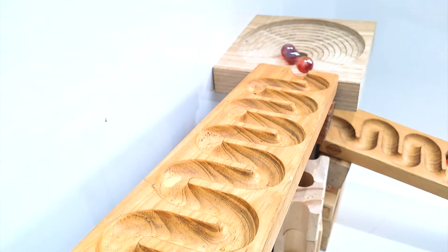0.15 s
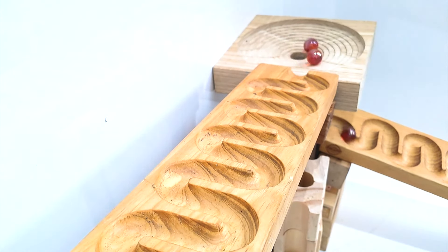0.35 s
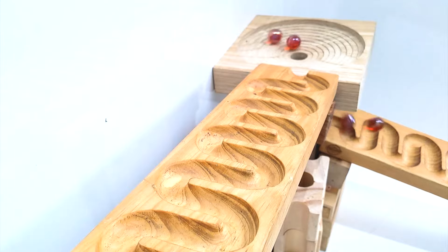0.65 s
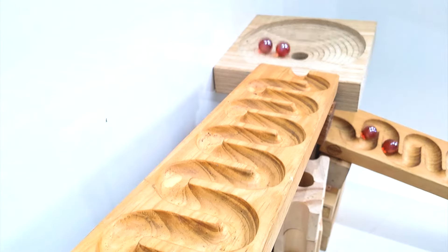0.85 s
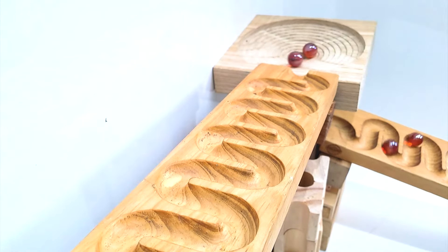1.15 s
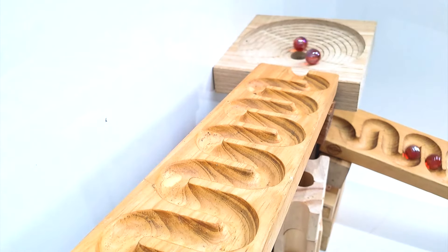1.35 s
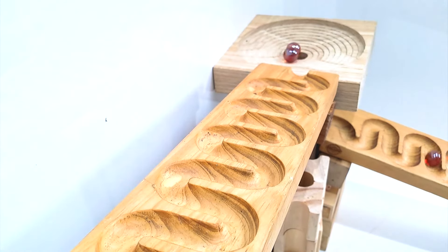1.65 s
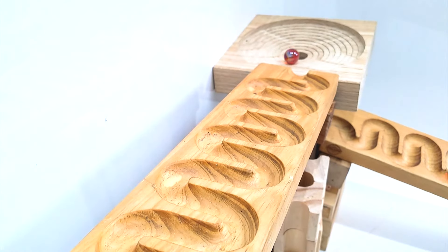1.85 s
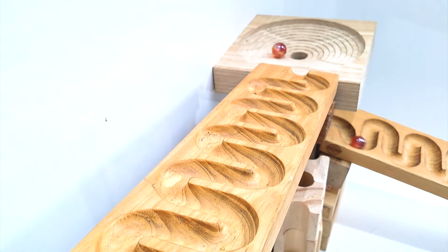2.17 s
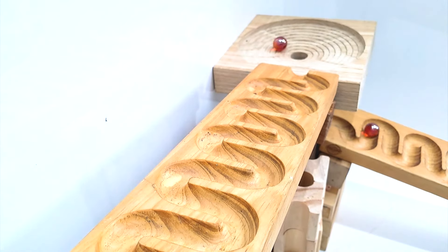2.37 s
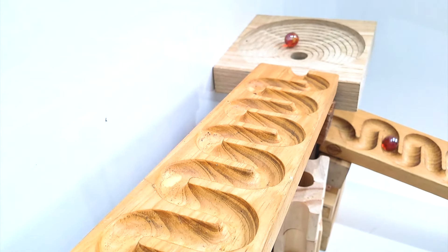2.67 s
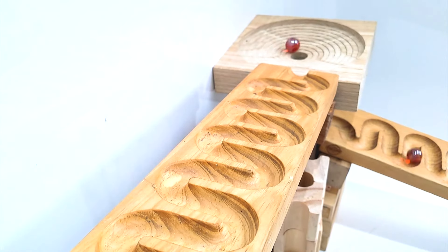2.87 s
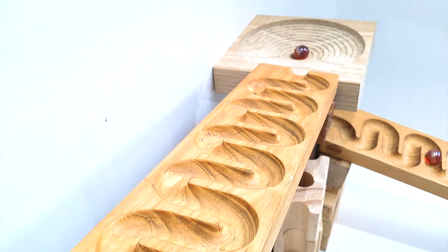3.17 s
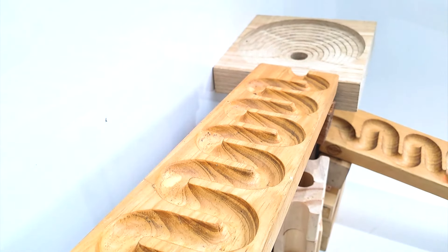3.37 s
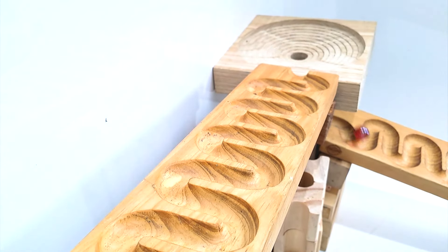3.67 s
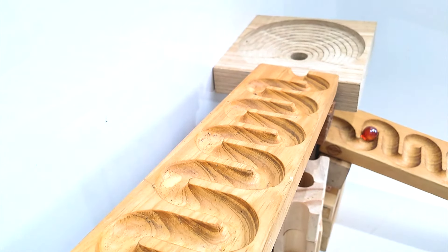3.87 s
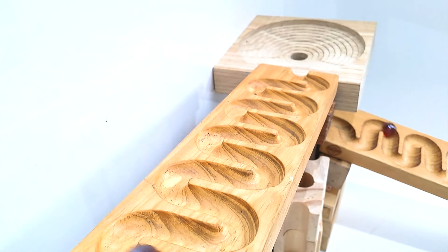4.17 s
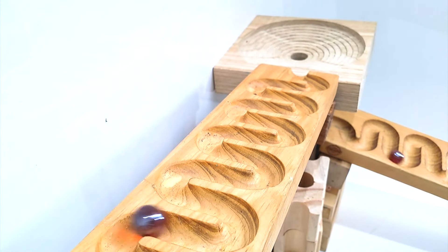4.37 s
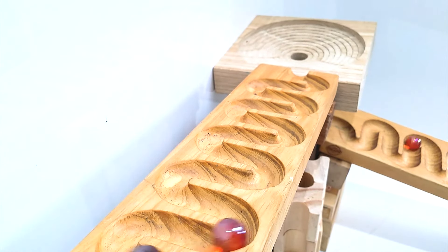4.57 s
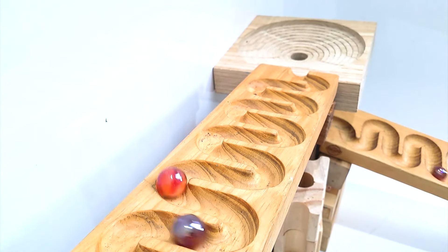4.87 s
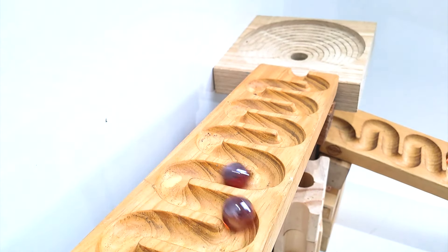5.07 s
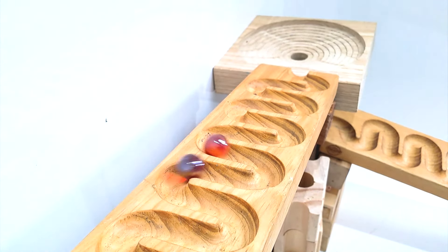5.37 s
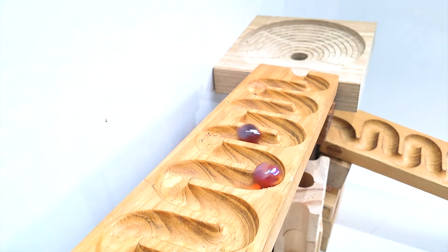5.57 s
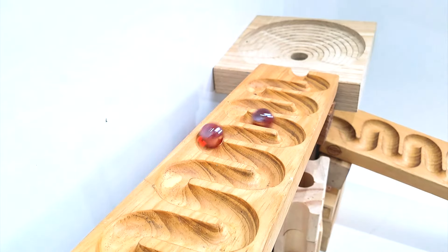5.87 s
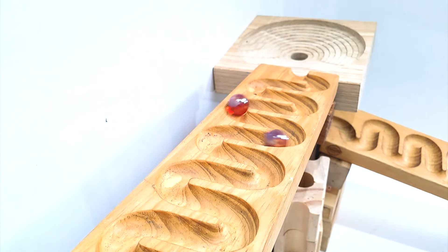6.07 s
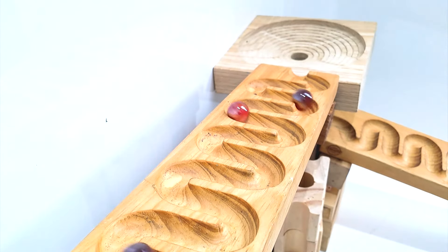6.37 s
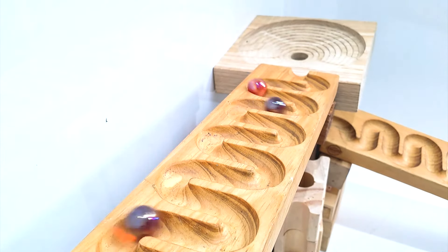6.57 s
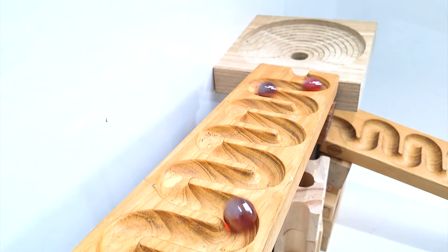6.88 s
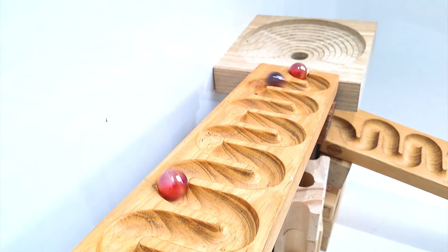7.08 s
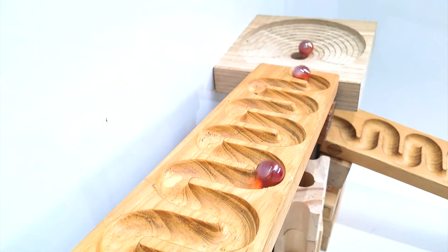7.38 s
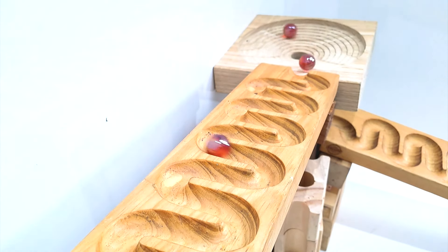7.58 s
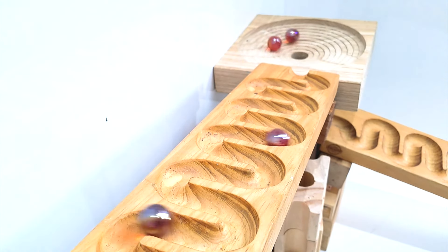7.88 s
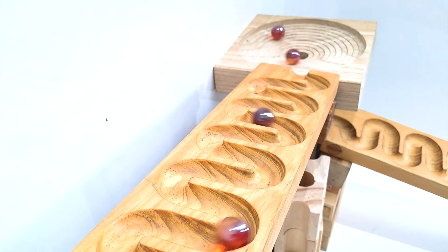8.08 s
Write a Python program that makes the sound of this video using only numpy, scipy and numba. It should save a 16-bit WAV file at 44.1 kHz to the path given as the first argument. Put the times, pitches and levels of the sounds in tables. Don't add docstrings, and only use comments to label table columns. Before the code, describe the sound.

Close, dry clicks of glass on wood: marbles tick through carved grooves, skitter brightly along thin chutes and bounce quickening in a wooden bowl.

```python
import sys
import numpy as np
from scipy import signal
from scipy.fft import rfft, irfft, next_fast_len
from scipy.io import wavfile
from scipy.ndimage import uniform_filter1d
from numba import njit

SR = 44100
rng = np.random.default_rng(int(sys.argv[2]) if len(sys.argv) > 2 else 0)


def gain_from_db(level_db):
    decades = np.asarray(level_db, float) / 20
    return 10 ** decades


def generate_wav(sig):
    pcm = np.round(np.clip(np.atleast_2d(sig).T, -1, 1) * 32767).astype(np.int16)
    wavfile.write(sys.argv[1], SR, pcm)


N = 362929
ALIKE_HZ = 573
CHUTE_EMPTY_DB = -43

# [t/s, peak level/dB, left minus right/dB, favoured mode f/Hz]
GROOVE_HITS = [(0.38, -19.5, -2, 1570), (0.6302, -15, 0, 1570), (0.7536, -17, -1, 3730),
               (1.558, -5, 2.5, 3110), (1.6334, -17, -0.5, 1690), (2.1347, -20.5, -6, 2870),
               (2.174, -9, 5, 3190), (2.247, -11, 6, 3190), (2.5142, -25, 8, 3060), (2.9864, -6.5, 3, 4340),
               (3.1638, -12, 5, 3190), (3.2093, -9, 4.5, 3190), (3.7653, -13, -6, 2870),
               (4.348, -15, 0, 1810), (4.56, -10, 6, 3190), (4.6027, -26, 2, 3040),
               (4.6304, -15.5, 3.5, 1690), (5.0626, -23.5, 0, 1940), (5.7595, -23.5, 5, 2010),
               (5.797, -27.5, 0, 1820), (6.0335, -26, 5, 3094), (6.0512, -20.5, 2, 3010),
               (6.121, -12, 0.5, 1810), (6.2046, -27, 3, 1900), (7.417, -14.5, 2, 1850),
               (7.733, -28, -7, 3300), (7.9258, -27.5, 0, 3250), (8.0047, -29, 3, 1810),
               (5.439, -12, 4.5, 3190), (5.498, -18, 7, 3190)]
# [t/s, peak level/dB, left minus right/dB, favoured mode f/Hz]
GROOVE_TAPS = [(0.275, -27, 2, 3600), (0.3223, -28, 0, 1570), (0.386, -21, -7, 2870),
               (0.396, -20, -4, 2870), (0.412, -34, -2, 2870), (0.762, -20.5, 6, 3810),
               (1.543, -36, -6, 3060), (2.2985, -22.5, -2, 1690), (2.527, -25, 0, 3060),
               (2.612, -34, 3, 3060), (2.7732, -34, -1, 1700), (2.79, -33, 0, 3060), (3.2548, -28, 2, 3190),
               (3.279, -20, 3, 3190), (3.601, -23, -3, 2870), (3.9539, -19, 2, 2365),
               (4.1984, -32, 5, 3060), (4.264, -28, 6, 2870), (4.376, -33, -2, 3753),
               (4.408, -27.5, -4, 1810), (4.439, -27.5, 0, 1810), (4.67, -32, -6, 2487),
               (4.8075, -34, 2, 1900), (4.8434, -29, -4, 2870), (4.852, -26.5, -2, 4340),
               (5.0464, -31, 0.5, 1570), (5.078, -34, -7, 2487), (5.15, -42, 2, 1900),
               (5.778, -27.5, -3, 1900), (5.864, -38, -4, 1840), (5.887, -29.5, 0, 1810),
               (5.895, -30.5, -2, 1810), (6.181, -29, -1, 3753), (6.259, -33, 4, 2487),
               (6.304, -31, -3.5, 3190), (6.34, -32, 2.5, 1810), (6.3731, -31, -0.5, 1840),
               (6.4163, -33, 0, 4000), (6.54, -36, -2, 3753), (6.604, -26.5, -2, 2870),
               (6.619, -26.5, -3, 4340), (6.8526, -23, 0, 2870), (7.191, -33, 2, 2487),
               (7.3272, -29, -7, 1810), (7.652, -28, 6, 4040), (7.693, -34, 2, 4030),
               (7.741, -26, -2, 3250), (7.871, -38, -2, 3250), (8.157, -35, 1, 3753), (8.199, -43, 0, 2870)]
# [t/s, peak level/dB, left minus right/dB, favoured mode f/Hz]
BOWL_HITS = [(0.061, -27, 9, 970), (0.1174, -13, -6, 1170), (0.449, -16.5, 1, 1170),
             (6.639, -4.5, -0.5, 1900), (6.924, -6, -1, 980), (7.109, -3, 3, 714), (7.246, -5.5, 0, 1920),
             (7.354, -7, 1.5, 1870), (7.434, -10.5, 1, 1466), (7.491, -12.5, 2, 1460),
             (7.538, -13, -1.5, 2677), (7.569, -16, -1, 590), (7.593, -18, 0.5, 3250),
             (7.613, -18.5, -2, 581), (7.649, -27, -13, 700), (7.689, -25.5, -8, 1380),
             (7.755, -12.5, 2, 3070), (8.07, -24.5, 1, 574)]
# contact rate [1/s], size spread [dB], haze level [dB], haze T60 [s],
# mode scatter [dB], favour [dB], contact softness [Hz]; every *_feel has these columns
RING_FEEL = (886, 3.5, 0, 0, 1, 19.5, 6004)


def colour(x, points):
    hz, db = np.transpose(points)
    size = next_fast_len(x.shape[-1])
    f = np.maximum(np.arange(size // 2 + 1) * SR / size, 1)
    gain = gain_from_db(np.interp(np.log(f), np.log(hz), db))
    return irfft(rfft(x, size) * gain, size)[..., :x.shape[-1]]


def ports(size):
    mid, side = rng.standard_normal((2, size))
    side = signal.sosfilt(signal.butter(1, ALIKE_HZ, "high", fs=SR, output="sos"), side)
    return np.array([mid + side, mid - side])


def fade(t60_s, size):
    return gain_from_db(-60 * np.arange(size) / SR / t60_s)


def walk(rate, size=N):
    k = int(SR / rate)
    steps = np.repeat(rng.standard_normal(size // k + 1), k)
    return uniform_filter1d(steps, k)[:size]


def curve(points, **ends):
    return np.interp(np.arange(N) / SR, *np.transpose(points), **ends)


def together(*db):
    return 10 * np.log10(sum(gain_from_db(d) ** 2 for d in db))


def runs(rows, landing_db=0):
    s, db, hold, fall = np.transpose(rows)[:4, :, None]
    landing_s, rise_db_per_s, silent_db = 0.063, 30000, -85
    age = np.arange(N) / SR - s
    db = db + landing_db * np.exp(-abs(age) / landing_s)
    db = db - fall * (age - hold).clip(0) + rise_db_per_s * age.clip(None, 0)
    return db.max(axis=0).clip(silent_db)


def contacts(rate, spread_db):
    x = (rng.random(N) < rate / SR) * gain_from_db(spread_db * rng.exponential(size=N).clip(0, 5))
    x = x * rng.choice([-1., 1.], N)
    return x / np.sqrt(np.mean(x ** 2))


def blows(hits):
    s, db, pan_db, _ = np.transpose(hits)
    return (s * SR).astype(int), gain_from_db(db + np.array([pan_db, -pan_db]) / 2)


def passed(hits, db, pan_db=0):
    return np.array(hits) + np.array([0, db, pan_db, 0])


@njit
def add(out, at, size, roll, wander, pole, turn):
    for c in range(2):
        z, k = 0j, 0
        for i in range(out.shape[1]):
            z = z * pole + roll[c, i] * wander[c, i >> 5] + 1e-18
            if k < len(at) and i >= at[k]:
                z, k = z + size[c, k], k + 1
            out[c, i] += (z * turn[c]).imag


def haze_ring(haze, feel, roll, at, size, hits_hz):
    haze_db, t60_s = feel[2], min(feel[3], 1 / 30)
    knock_db, knock_t60_s, knock_rise_s = -8.5, 0.03, 0.00045
    tail = colour(ports(size=4096), haze) * fade(t60_s, size=4096)
    push = roll * rng.choice([-1., 1.], (2, N)) / np.sqrt(np.sum(tail ** 2) / 2)
    out = gain_from_db(haze_db) * signal.oaconvolve(push, tail, axes=1)[:, :N]
    t = np.arange(1024) / SR
    for i, s, f in zip(at, size.T, hits_hz):
        knock = np.sin(2 * np.pi * f * t) * fade(knock_t60_s, size=1024)
        knock *= 1 - np.exp(-t / knock_rise_s)
        out[:, i:i + 1024] += gain_from_db(knock_db) * np.outer(s * rng.choice([-1, 1], 2), knock)
        spot = colour(ports(size=1024), haze) * fade(t60_s, size=1024)
        out[:, i:i + 1024] += gain_from_db(haze_db) * s[:, None] * spot / np.abs(spot).max()
    return out


def body(modes, haze, feel, roll_db, pan_db, hits, place_hz=None):
    rate, spread_db, _, _, scatter_db, favour_db, soft_hz = feel
    hz, width_hz, db = np.transpose(modes)
    hits = np.array(sorted(map(tuple, hits)))
    at, size = blows(hits)
    pole = np.exp((2j * np.pi * hz - np.pi * width_hz) / SR)
    gain = gain_from_db(db) * (1 - abs(pole))
    power = np.sum(gain ** 2 / (1 - abs(pole) ** 2)) / 2
    roll = contacts(rate, spread_db) * gain_from_db(roll_db) * gain_from_db([[pan_db / 2], [-pan_db / 2]])
    near = np.exp(-(np.log(hz / hits[:, 3:]) / 0.043) ** 2)
    place_db = scatter_db * rng.standard_normal((len(hits), len(hz))) + favour_db * near
    place_db -= 10 * np.log10(np.sum((gain * gain_from_db(place_db)) ** 2, axis=1, keepdims=True))
    lag = np.outer(rng.uniform(-1.234, 1, len(hz)) * (hz / ALIKE_HZ / 4).clip(0, .5), [1, -1])
    turn = np.exp(1j * np.pi * (lag + rng.integers(0, 2, (len(hz), 1))))
    out = np.zeros((2, N))
    for k in range(len(hz)):
        both, left, right = (walk(32 * 9., size=N // 32 + 1) for _ in range(3))
        apart = min(hz[k] / 2500, 1.2) * np.array([left, right])
        wander = gain_from_db(scatter_db * (both + apart)) / np.sqrt(power)
        if place_hz is not None:
            near = np.exp(-(np.log(hz[k] / place_hz[::32]) / 0.054) ** 2)
            wander *= gain_from_db(favour_db * (near - .5))
        add(out, at, size * gain_from_db(place_db[:, k]), roll, wander, pole[k], gain[k] * turn[k])
    if haze:
        out += haze_ring(haze, feel, roll, at, size, hits[:, 3])
    return signal.sosfilt(signal.butter(2, min(soft_hz, .45 * SR), fs=SR, output="sos"), out)


def air():
    # [f/Hz, density/(dB per Hz)]
    air_spectrum = [(15, -58.5), (45, 15.5), (100, 29), (165, 13), (200, 15), (1060, 11.5), (1730, 9),
                    (3130, -19.5), (3470, -62.5), (3750, -40.5), (12000, -69.5), (15600, -87.5),
                    (22000, -120)]
    x = colour(ports(size=N), air_spectrum)
    return x * gain_from_db(-46.5 + 1.8 * walk(0.53)) / np.sqrt(np.mean(x ** 2))


def room(x):
    level_db, t60_low_s, t60_high_s, gap_s = -9.5, 0.27, 0.16, 0.011
    noise = ports(size=16384)
    low = signal.sosfilt(signal.butter(1, 1500, fs=SR, output="sos"), noise)
    tail = low * fade(t60_low_s, size=16384) + (noise - low) * fade(t60_high_s, size=16384)
    tail *= np.arange(16384) > gap_s * SR
    tail /= np.sqrt(np.sum(tail ** 2) / 2)
    return gain_from_db(level_db) * signal.oaconvolve(x, tail, axes=1)[:, :N]


def far_ticks(db):
    # [f/Hz, density/(dB per Hz)]
    tick_haze = [(2500, -37.5), (4000, 0.5), (8000, -5.5), (11500, -8), (13500, -27.5)]
    # [t/s, peak level/dB]
    lone_ticks = [(1.0031, -39), (1.623, -29), (2.5935, -34.5), (3.1223, -29), (4.2822, -23), (4.34, -27),
                  (4.6798, -35), (4.801, -36), (7.7546, -29), (0.0787, -20.5), (0.288, -21.5), (0.378, -28),
                  (0.4489, -38), (0.6175, -31), (0.6978, -43.5), (0.824, -60), (0.857, -41), (0.9093, -50),
                  (0.9707, -43.5), (1.7275, -45), (1.7614, -59), (1.8617, -44), (2.4463, -54),
                  (2.6389, -43), (2.7781, -62), (2.9477, -56), (3.3139, -42), (4.15, -41), (4.4121, -34),
                  (4.4894, -51), (4.5079, -37), (4.7603, -46), (4.8297, -41), (5.0562, -55), (5.7296, -44),
                  (5.8748, -43), (5.99, -43), (6.2564, -58), (6.2864, -52.5), (6.4051, -52),
                  (6.6166, -41.5), (7.085, -28), (7.1793, -31), (8.1576, -49)]
    rate, spread_db, t60_s, snap_db = 330, 5.5, 0.04, -24
    tail = fade(t60_s, size=4096)
    push = np.abs(contacts(rate, spread_db)) * gain_from_db(db) / np.sqrt(np.sum(tail ** 2))
    snaps = passed(GROOVE_HITS + BOWL_HITS, snap_db)[:, :2]
    s, peak_db = np.vstack([lone_ticks, snaps]).T
    push[(s * SR).astype(int)] += gain_from_db(peak_db - 8)
    hiss = colour(ports(size=N), tick_haze)
    return hiss / np.sqrt(np.mean(hiss ** 2)) * signal.oaconvolve(push, tail)[:N]


def table_bump():
    # [f/Hz, width/Hz, level/dB]
    table_modes = [(67.6, 25, -8), (90, 20, 12), (125, 31, -44.5)]
    table_feel = (91, 4, 0, 0, 9.5, -9, 136)
    # [t/s, peak level/dB, left minus right/dB, favoured mode f/Hz]
    bumps = [
        (0.856, -7, 0.9, 90),
        (0.899, -23, 0.91, 102),
        (0.927, -15, 1, 110),
        (1.1, -21.5, 0.91, 90),
        (0.983, -18, 1, 75),
        (1.01, -21.5, 0.9, 90),
    ]
    return body(table_modes, None, table_feel, -99, 0, bumps)


def stand(rattle_db, rolling_db):
    # [f/Hz, width/Hz, level/dB]
    stand_modes = [(109.7, 10.4, 0), (119.8, 42.6, 0), (193.2, 19.3, 0.5), (237.5, 11.4, -3.5),
                   (354, 37.4, -0.5), (442.3, 28.5, -1)]
    stand_feel = (802.5, 1, 0, 0, 2, 4, 594.5)
    # [from t/s, level/dB, lasts/s, decay/(dB per s)]
    shudder = [
        (0.86, -32, 0.024, 112),
        (8.07, -35.5, 0.074, 20),
    ]
    rest_db, from_bowl_db, knock_db = -45, 2, -16.5
    loud_db = -29.5 + 0.66 * (rattle_db + 26)
    level_db = together(rest_db, rolling_db + from_bowl_db, runs(shudder), loud_db)
    return body(stand_modes, None, stand_feel, level_db - 2.5, 2.2, passed(BOWL_HITS + GROOVE_HITS, knock_db))


def bowl(rolling_db, crossing_db):
    # [f/Hz, width/Hz, level/dB]
    bowl_modes = [(579, 44, 1.5), (700, 49, -0.5), (960, 75, -1.5), (1190, 60, 0), (1560, 99, -1),
                  (1900, 90, -2), (2677, 160, -0.5), (3250, 33, -1.5), (3893, 79, -6.5)]
    # [f/Hz, density/(dB per Hz)]
    bowl_haze = [(150, -52.5), (280, -20), (344, 5.5), (490, 3.5), (720, 10.5), (1390, 6), (1890, 2.5),
                 (3960, -0.5), (14000, -57.5)]
    bowl_feel = (700, 3.6, 2.3, 0.75, 3.8, 3.5, 6050)
    from_chute_db, from_groove_db = -12, -7.5
    level_db = together(rolling_db, crossing_db + from_chute_db)
    hits = np.vstack([passed(BOWL_HITS, db=-3.0), passed(GROOVE_HITS, from_groove_db)])
    return body(bowl_modes, bowl_haze, bowl_feel, level_db + 0.45, 0.6, hits)


def far_grooves(place_hz):
    # [f/Hz, width/Hz, level/dB]
    far_groove_modes = [(1640, 83, -5), (1830, 65, 2.5), (2400, 80, 3), (2830, 45, -8), (3210, 55, 1.5)]
    # [t/s, level/dB]
    far_groove_roll = [(0, -59.5), (0.62, -58.5), (1.1, -59), (2.3, -56.5), (3.1, -52), (4.2, -58), (4.75, -64),
                       (4.82, -48), (5.2, -48), (5.75, -53.5), (6.1, -50), (6.14, -41), (6.6, -47), (7.6, -59),
                       (7.85, -49), (8.02, -43), (8.23, -50)]
    far_groove_feel = (599.5, 6, 0, 0, 0.5, 16, 5998)
    return body(far_groove_modes, None, far_groove_feel, curve(far_groove_roll), 1.5, passed(GROOVE_TAPS, db=-17.0), place_hz)


def grooves(place_hz):
    # [f/Hz, width/Hz, level/dB]
    groove_modes = [(1570, 17, -1.5), (1690, 42, -1), (1810, 31, 0), (1900, 25, 0.5), (2358, 50, -3),
                    (2487, 38, 1.5), (2870, 41, -1), (3060, 92, -3), (3190, 86, -4), (3753, 81, -5.5),
                    (4090, 41, -6.5), (4340, 44, -8.5), (4800, 81, -8), (5430, 90, -13)]
    # [f/Hz, density/(dB per Hz)]
    groove_haze = [(700, -35), (1140, -31.5), (1840, -28), (2080, 24), (3150, 12), (3430, 15), (6000, 2.5),
                   (11200, -59.5), (13000, -51)]
    groove_feel = (892, 5, -12, 4, 4.5, 14, 5499)
    # [t/s, level/dB]
    groove_roll = [(0, -40), (0.13, -66), (0.69, -84), (0.75, -35.5), (1.03, -50.5), (1.22, -37),
                   (1.37, -72), (1.86, -74.5), (3.33, -74), (3.66, -31), (4.16, -50), (4.68, -45.5),
                   (5.3, -70), (5.55, -36), (5.72, -46), (7.1, -45.5), (7.59, -49), (8.23, -63)]
    hits = GROOVE_HITS + GROOVE_TAPS
    return body(groove_modes, groove_haze, groove_feel, curve(groove_roll) + 0.32, 0.52, hits, place_hz)


def short_chute():
    # [f/Hz, width/Hz, level/dB]
    short_modes = [(3400, 140, -3), (5630, 140, -1), (3620, 65, -0.5)]
    # [t/s, level/dB]
    short_roll = [
        (0.116, -15),
        (0.262, -25.5),
        (0.33, -62),
        (0.36, -69),
    ]
    # [t/s, peak level/dB, left minus right/dB, favoured mode f/Hz]
    short_hits = [
        (0.1178, -4.5, -6.5, 5620),
        (0.152, -15, 5, 3400),
        (0.2315, -8.5, 0.5, 3400),
    ]
    roll_db = curve(short_roll, left=-99, right=-99)
    return body(short_modes, None, RING_FEEL, roll_db - 1.5, 0, short_hits)


def chute_middle(level_db, hits):
    # [f/Hz, width/Hz, level/dB]
    ring_modes = [(4435, 40, -12), (4583, 22, 1), (4619, 24, 1), (4656, 26, 2), (4755, 45, -9.5),
                  (5040, 200, -16.5)]
    silent_db = 40 * (abs(np.arange(N) / SR - 0.56) < 0.445)
    return body(ring_modes, None, RING_FEEL, level_db - silent_db - 3.5, 0, passed(hits, db=-14.0, pan_db=5.0))


def chatter(hits):
    level_db, decay_s = 5, 0.019
    kick = np.zeros(N)
    kick[blows(hits)[0]] = 1
    stir = signal.lfilter([1], [1, -np.exp(-1 / SR / decay_s)], kick)
    return level_db * (stir.clip(0, 1) - .5)


def chute(rattle_db, ring_db):
    # [f/Hz, width/Hz, level/dB]
    chute_modes = [(6200, 38, -10.0), (6750, 73, -7.5), (8340, 260, -7.5), (8550, 90, -12),
                   (9460, 71, -8.5), (9760, 120, -4.5), (10200, 49, -9.0), (10700, 78, -2.5),
                   (11370, 190, 0.5), (12200, 150, -10.0), (13400, 200, -2.5), (14450, 250, -10),
                   (15300, 400, -2.5), (1420, 200, -3.5)]
    # [f/Hz, density/(dB per Hz)]
    chute_haze = [(350, -13.5), (700, -8), (3480, -19), (4720, -7.5), (5570, -13), (6950, -13),
                  (7440, -10.5), (11400, -5.5), (14500, -22), (16400, -91)]
    chute_feel = (1100, 3.9, 1.1, 0.8, 4.5, 28, 14300)
    # [t/s, peak level/dB, left minus right/dB, favoured mode f/Hz]
    rim_hits = [(1.1727, -15.5, -8.5, 11700), (1.2158, -18, 1, 6750), (1.6584, -26.5, 0.5, 8340),
                (1.8754, -6, -2, 1370), (1.9579, -14, 1, 1440), (1.969, -5, 2, 1460),
                (5.3712, -25.5, -7, 1420), (2.2864, -13, 1, 1670), (2.4718, -28.5, -5, 1280),
                (3.4713, -10.5, 1, 8550), (4.0779, -24, -6, 1390), (4.2657, -56, 20, 1560),
                (5.2152, -12, -7.5, 1450), (5.5984, -19.5, 9.5, 1390)]
    # [t/s, peak level/dB, left minus right/dB]
    bounces = [(1.044, -3.5, 10.5), (1.238, -20.5, -7), (1.4415, -30, -16), (2.025, -15, -7),
               (2.0646, -12, 5), (3.3443, -3.5, 3), (3.5092, -12, -5), (3.5338, -23.5, -1.5),
               (3.6576, -3.5, 0.5), (3.668, -16, 6), (3.7227, -17.5, 15), (3.7498, -26.5, 3),
               (3.809, -11.5, 5), (3.8157, -12, -2.5), (3.8388, -13, -1.5), (3.8678, -12.5, 3.5),
               (3.945, -16.5, -3.5), (3.904, -20, -18), (5.225, -18, -3), (5.253, -14, -10),
               (5.293, -14.5, -13.5), (5.325, -14, -11), (5.334, -12, -6.5), (5.3585, -19.5, 13.5),
               (5.387, -18, -9.5), (5.3948, -10.5, 3.5), (5.4252, -16.5, 4), (6.774, -2.5, 8),
               (6.836, -12.5, -6.5), (6.852, -10.5, -6.5), (6.8957, -15, -1), (1.2032, -30, 4),
               (5.262, -15, 0)]
    # [f/Hz, level/dB]
    hollow = [(3000, 0), (3300, 0), (3500, -11.5), (3720, 1), (5500, 2), (6100, -2), (6600, 2.5),
              (7100, 3.5), (7550, -9.5), (7950, -5)]
    # [f/Hz, left minus right/dB]
    lean = [(400, -3), (2400, 2), (4400, -4), (9500, -14), (15000, -2)]
    middle_hz = 4580
    hits = rim_hits + [tuple(row) + (middle_hz,) for row in bounces]
    stirred_db = chatter(hits) - 2 * np.maximum(CHUTE_EMPTY_DB - rattle_db, 0)
    x = body(chute_modes, chute_haze, chute_feel, rattle_db + stirred_db - 2.5, 0, hits)
    x += chute_middle(ring_db + stirred_db, hits)
    x = colour(x, hollow) + short_chute()
    return np.array([colour(x[c], np.multiply(lean, (1, .5 - c))) for c in range(2)])


def marble_runs():
    # [lands t/s, rattle level/dB, rolls/s, decay/(dB per s), ring above rattle/dB]
    chute_runs = [(0.0, -36.5, 0.03, 100.5, 7), (0.114, -29, 0.0069, 82.5, 1.5),
                  (1.043, -29.5, 0.016, 161, 11), (1.174, -34.5, 0.04, 200, -27),
                  (1.212, -32.5, 0.078, 185, 4), (1.878, -29.5, 0.22, 93, -0.5),
                  (2.988, -49.5, 0.0046, 200, 25), (3.344, -28, 0.056, 81.5, 3.5),
                  (3.508, -31, 0.073, 233, 6), (3.657, -30, 0.31, 139, 9), (5.2155, -28, 0.25, 166, 9.5),
                  (5.589, -38.5, 0.041, 150, -10), (6.639, -40.5, 0.009, 198, 1),
                  (6.775, -29, 0.19, 144, 6)]
    # [from t/s, level/dB, lasts/s, decay/(dB per s)]
    far_runs = [
        (0.748, -46, 0.005, 108),
        (0.92, -64, 0.33, 194),
        (1.35, -53.5, 0.0046, 34),
        (2.3, -48, 0.02, 42.5),
        (2.985, -55.5, 0.5, 201),
        (4.1, -64.5, 0.81, 35.5),
        (5.7, -49, 0.14, 57.5),
        (7.0, -47.5, 0.5, 223),
        (7.757, -42, 0.0054, 294),
    ]
    landing_db = 6.5
    crossing_db = runs(chute_runs, landing_db)
    rattle_db = np.maximum(crossing_db, runs(far_runs))
    ring_rows = [(s, db + above, hold, fall) for s, db, hold, fall, above in chute_runs]
    return crossing_db, rattle_db, runs(ring_rows, landing_db)


def scene():
    # [t/s, level/dB]
    bowl_roll = [(0.15, -34), (0.72, -50), (1.03, -58.5), (1.86, -50), (3.33, -44), (4.68, -60),
                 (5.2, -49.5), (5.71, -56), (6.26, -50), (6.62, -69), (6.64, -25.5), (6.76, -44),
                 (7.08, -49.5), (7.59, -40), (7.77, -46), (7.86, -50.5), (8.06, -51), (8.075, -44)]
    # [t/s, favoured mode f/Hz]
    groove_place = [(0, 2870), (.6, 1570), (2.3, 1690), (3.05, 1690), (3.3, 3190), (4.1, 1690), (4.4, 1856),
                    (5.2, 1873), (5.8, 1877), (6.6, 1797), (7.4, 1830), (7.7, 3250), (7.82, 3250),
                    (7.95, 1810)]
    crossing_db, rattle_db, ring_db = marble_runs()
    rolling_db = curve(bowl_roll)
    place_hz = curve(groove_place)
    near = far_ticks(np.minimum(rattle_db, CHUTE_EMPTY_DB) - 9.0)
    near += table_bump()
    near += stand(rattle_db, rolling_db)
    near += bowl(rolling_db, crossing_db)
    near += far_grooves(place_hz)
    near += grooves(place_hz)
    near += chute(rattle_db, ring_db)
    return near + room(near) + air()


def roll_off(x):
    return signal.sosfilt(signal.butter(12, 16530, fs=SR, output="sos"), x)


def record(dry):
    low_hz, top_hz = 64.3, 15900
    x = signal.sosfilt(signal.butter(2, low_hz, "high", fs=SR, output="sos"), dry)
    x = signal.sosfilt(signal.butter(8, top_hz, fs=SR, output="sos"), x)
    return roll_off(np.tanh(1.105 * x) / 0.98)


dry = scene()
out = record(dry)
generate_wav(out)
```